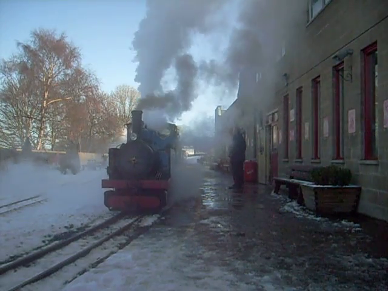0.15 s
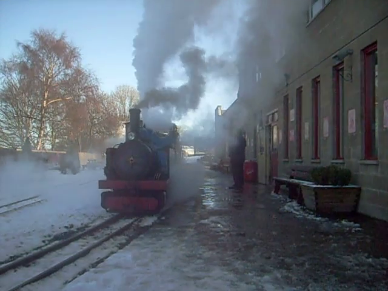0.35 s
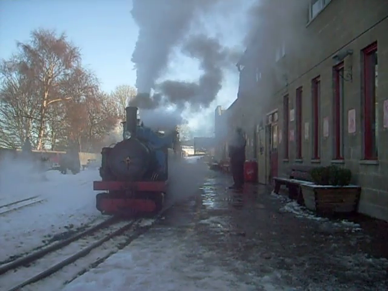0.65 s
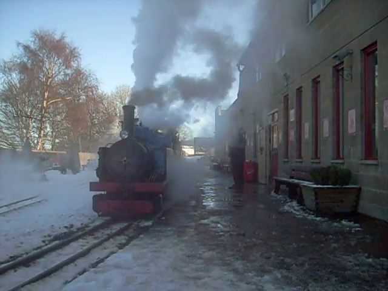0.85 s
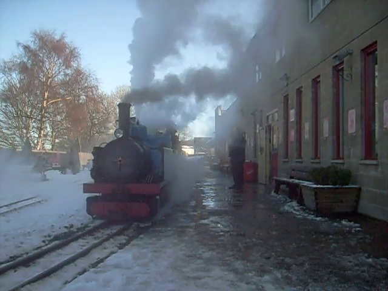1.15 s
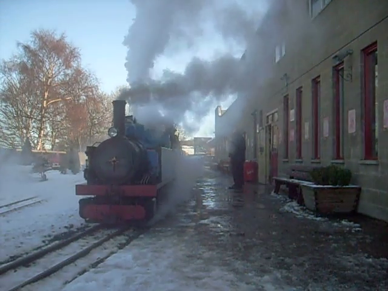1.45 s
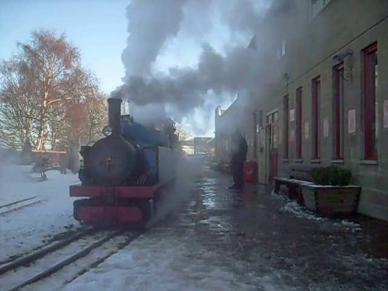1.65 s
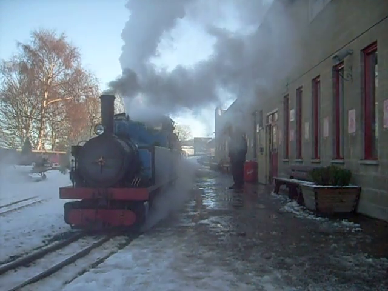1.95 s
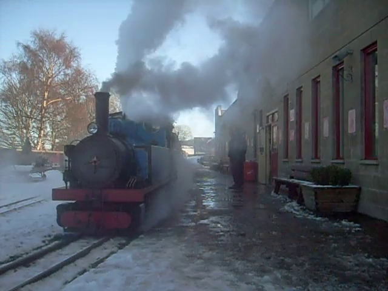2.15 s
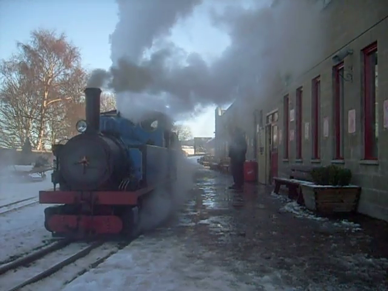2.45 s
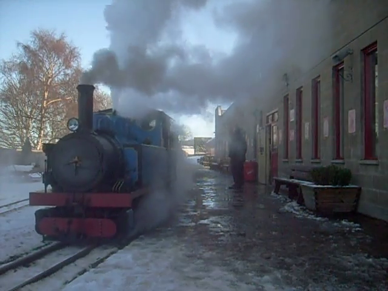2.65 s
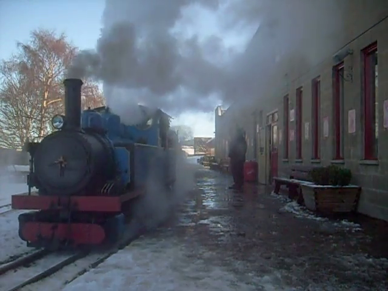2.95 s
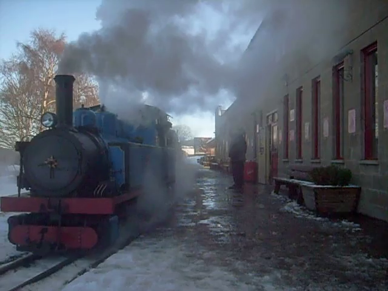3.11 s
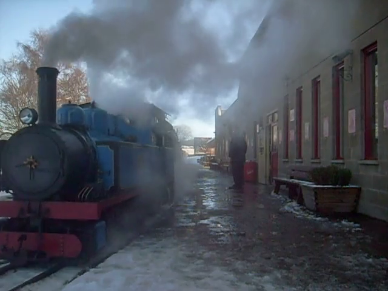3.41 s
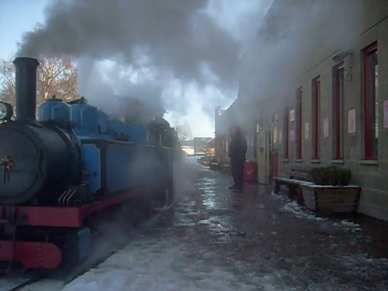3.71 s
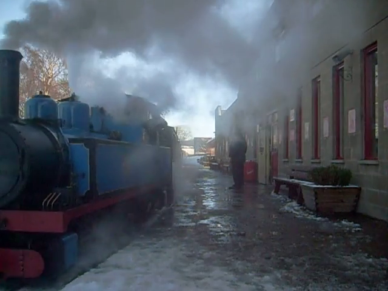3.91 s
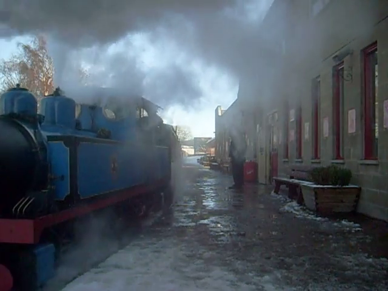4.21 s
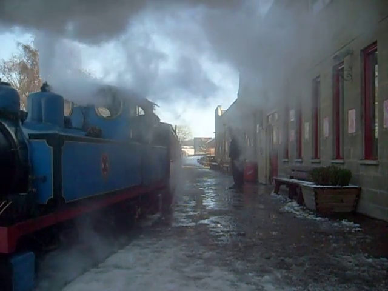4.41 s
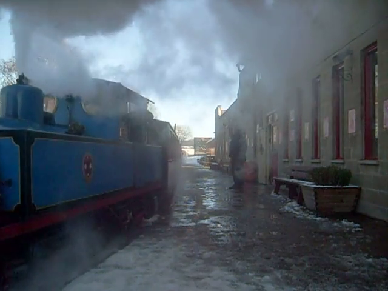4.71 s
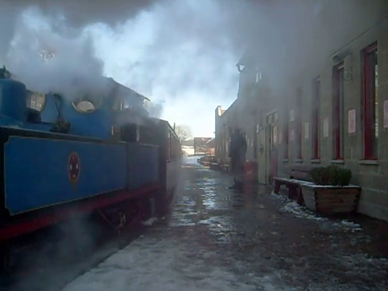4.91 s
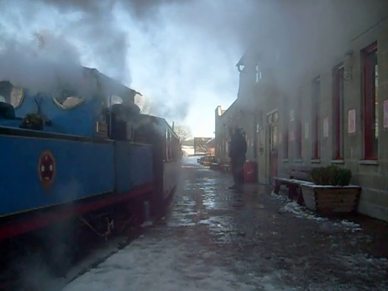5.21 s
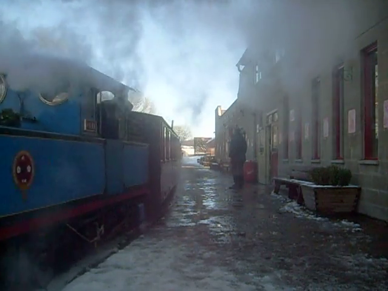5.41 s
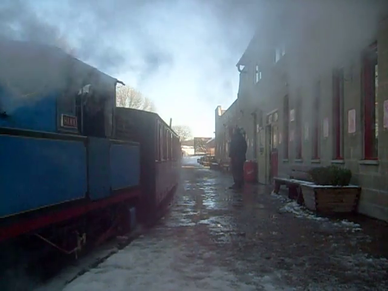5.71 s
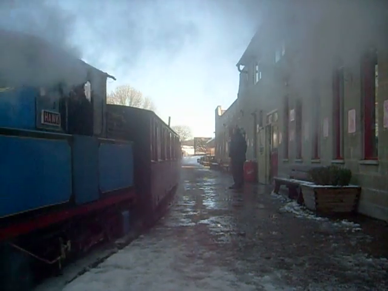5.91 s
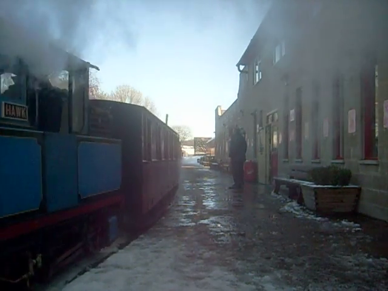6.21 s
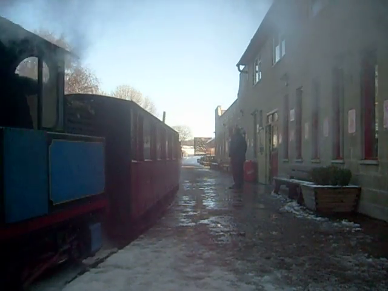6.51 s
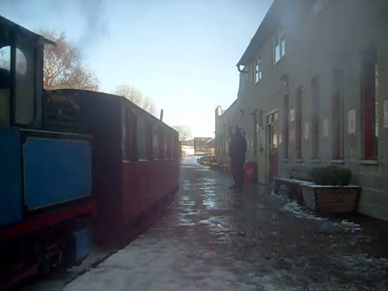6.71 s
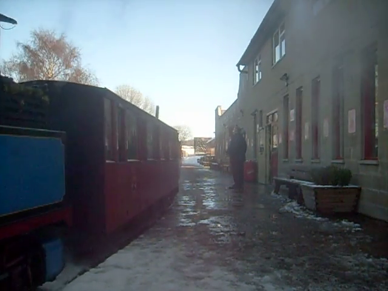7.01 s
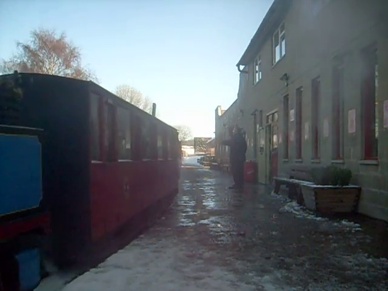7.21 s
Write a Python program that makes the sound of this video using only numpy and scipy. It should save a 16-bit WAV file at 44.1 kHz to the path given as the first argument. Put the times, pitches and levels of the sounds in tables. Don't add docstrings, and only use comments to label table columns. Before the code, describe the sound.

A small steam engine creeps past a platform with a loud, unbroken, ringing steam hiss that swells to near overload, over dull rumbles and rod knocks.

```python
import sys
import numpy as np
from scipy import signal
from scipy.fft import rfft, irfft, next_fast_len
from scipy.io import wavfile
from scipy.ndimage import uniform_filter1d

SR = 44100
rng = np.random.default_rng(int(sys.argv[2]) if len(sys.argv) > 2 else 0)


def volts_from_decibels(level):
    exponent = np.asarray(level, float) / 20
    return 10 ** exponent


def log_audio(samples):
    frames = np.atleast_2d(samples).T
    limited = np.clip(frames, -1, 1)
    pcm = np.round(limited * 32767).astype(np.int16)
    wavfile.write(sys.argv[1], SR, pcm)


N = 324334
T = np.arange(N) / SR
HZ = np.fft.rfftfreq(next_fast_len(N), 1 / SR)

# time in seconds, level of the ringing ridge in dB, level of the open jet in dB.
VALVE_LEVELS = [(0, -21, -22), (.36, -16.5, -21.5), (.6, -19, -19.5), (1.0, -19.5, -20), (1.44, -21, -18.5),
                (1.85, -14.5, -18), (2.3, -17, -16.5), (3.06, -19, -17), (3.5, -17, -17.5),
                (3.96, -18.5, -16.5), (4.32, -14, -17), (4.8, -13, -16), (5.2, -13.5, -13.5),
                (5.45, -14.5, -12.5), (5.9, -13.5, -10.5), (6.45, -13.5, -8), (6.85, -10, -11.5),
                (7.36, -9.5, -9)]
# frequency in Hz, level in dB.
JET_COLOUR = [(500, -39.5), (850, -27.5), (1050, -24), (1500, -16), (2050, -10), (2350, -7), (2600, -0.5),
              (2780, 1), (2950, -0.5), (3250, -5.5), (3600, -10.5), (4300, -15), (5400, -23.5),
              (9000, -35.5)]
JET_PARTS_HZ = [
    1270,
    1870,
    2860,
    4370,
]
# time in seconds, lags in ms by boiler top, ground, cab and wet paving.
ECHO_LAGS_MS = [
    (0, 0.81, 1.6, 3.25, 5.35),
    (1.5, .79, 1.95, 3.15, 5.95),
    (3.2, 0.84, 1.57, 3.11, 5.8),
    (4.25, 0.87, 1.92, 2.93, 5.6),
    (5.5, 0.765, 2.66, 2.7, 4.85),
    (6.6, .62, 3.3, 2.22, 3.93),
    (7.36, 0.59, 4.4, 2, 3.85),
]
# centre in Hz, width in Hz, level in dB.
COCK_HOLES = [
    (6440, 2600, -2.5),
    (9790, 2300, 0.5),
]
# start in seconds, length in seconds, wide cock in dB, narrow cock in dB.
COCK_PUFFS = [(.45, 0.15, -35, -45), (1.05, .08, -34, -53), (1.297, 0.07, -34.5, -47), (1.58, .1, -33, -46),
              (1.838, .22, -37, -41.5), (2.17, 0.089, -50, -37), (2.446, 0.092, -41, -36.5),
              (2.62, .08, -31.5, -35.5), (2.74, 0.29, -34, -39.5), (3.15, .14, -41, -45),
              (3.497, 0.095, -30, -35.5), (3.7, 0.11, -35, -50), (3.927, 0.19, -32.5, -38),
              (4.82, 0.13, -36, -37), (5.15, 0.13, -33, -36), (5.46, 0.16, -37, -36.5),
              (5.722, 0.1, -39, -36.5), (6.14, .12, -43, -35), (6.37, 0.3, -46, -44),
              (6.693, 0.067, -26, -53), (7.02, 0.049, -28.5, -55), (7.3, .1, -37, -40)]
# start in seconds, length in seconds, level in dB, first pitch in Hz.
COCK_SONGS = [
    (.48, .2, -44, 6600),
    (2.62, 0.46, -36.5, 6800),
    (3.48, .14, -37, 6700),
    (3.9, 0.32, -39, 6780),
    (4.8, 0.22, -39, 6870),
]
# centre in Hz, width in Hz.
ROLLING_BANDS = [
    (90, 300),
    (330, 350),
    (680, 610),
]
# start in seconds, length in seconds, then the rise in dB of
ROD_LURCHES = [(.45, 0.17, 10, -2, -6), (.9, .1, 0.5, 3, -5), (1.3, 0.21, 10, 6.5, -1),
               (1.92, 0.14, -1, 6, -6), (2.2, 0.83, -2, 1, 0.5), (3.12, .08, 2.5, 13, 6),
               (3.417, 0.5, 0, 5, 1.5), (4.18, .1, -2, 5, 3), (4.45, 0.079, 9, 8, 7),
               (5.047, .3, 3.5, 2.5, -1), (5.82, .2, 2, 5, -4), (7.25, .1, -2, 1.2, -4)]
# start in seconds, peak in dB, ring in Hz.
ROD_KNOCKS = [(1.309, -42, 161), (1.399, -33, 296), (3.138, -38, 331), (3.667, -27.5, 338),
              (3.834, -37, 413), (4.462, -32, 428), (4.535, -36, 362), (5.747, -33, 354), (5.883, -30, 317),
              (6.104, -29, 334), (6.847, -36, 272), (6.962, -34, 191)]
# start in seconds, peak in dB.
METAL_TICKS = [
    (4.4592, -7),
]
# start in seconds, length in seconds, level in dB, pitch in Hz.
CURVE_GROANS = [
    (.5, 1.2, -50.5, 950),
    (.9, 1.6, -56.5, 730),
    (1.9, 0.67, -55, 260.6),
    (3.3, .25, -51, 324),
    (3.74, .22, -48, 370),
    (4.0, 0.76, -45.5, 1002),
    (5.0, .7, -53.5, 366),
    (5.52, .65, -49.5, 653),
    (5.85, .4, -45, 936),
    (6.45, .2, -52, 300),
]
# frequency in Hz, gain in dB.
UPSAMPLER_GAIN = [
    (10300, 0),
    (11000, -4),
    (11600, -12.5),
    (12100, -24),
    (12500, -60),
    (13000, -90),
]

APPROACH_DB_PER_S, ABREAST_S = 1.5, 6.56
LOW_SIDE_DB, LOW_SIDE_SHARE = -22, 1
HIGH_SIDE_DB, CAB_SHADE_DB, CAB_PASSES_S, CAB_TAKES_S = 0.36, -8.5, 6.52, 0.81
SPIT_DB, SPIT_FROM_S, SPIT_TAKES_S, SPIT_PER_S, SPIT_RIDGE = 3.5, 6.25, 0.86, 110, 0.18
ECHO_DB, ECHO_TOP_HZ = [-23, -17.5, -20, -13], 5900
LEAK_DB, LEAK_SHARE = [-42, -47.5], [.15, 0.6]
PUFF_ATTACK_S, PUFF_RELEASE_S = 0.11, 0.09
SONG_WIDTH_HZ, SONG_EDGE_S, SONG_SAG_HZ_PER_S = 1000, 0.056, 1200
GEAR_DB, GEAR_SHARE, LURCH_EDGE_S = [-65, -60.5, -56], [1.56, 1.4, 1.14], .07
KNOCK_T60_S = 0.075
TICK_RING_HZ, TICK_RING_DB, TICK_T60_S = 5600, -3.5, .003
GROAN_WIDTH_HZ, GROAN_EDGE_S = 64, 0.067
CLIP_LEVEL, CEILING = .68, .716


def valve(spit_db):
    ridge_db, shoulder_db = curves(VALVE_LEVELS)
    low_db = LOW_SIDE_DB + LOW_SIDE_SHARE * approach_db()
    cab_passed = (1 + np.tanh((T - CAB_PASSES_S) / CAB_TAKES_S)) / 2
    high_db = shoulder_db + HIGH_SIDE_DB + CAB_SHADE_DB * cab_passed
    octave = np.log2(HZ + 1e-9)
    jet_hz, jet_db = np.transpose(JET_COLOUR)
    colour = volts_from_decibels(np.interp(octave, np.log2(jet_hz), jet_db, -99, -99))
    ridge_rms = np.sqrt(np.mean(colour ** 2 * (HZ > 2400) * (HZ < 3400)))
    surge = .5 * walk(28)
    jet = 0
    for centre in np.log2(500) + np.arange(14) / 3:
        band = np.cos(np.pi / 2 * np.clip(3 * (octave - centre), -1, 1))
        low, shoulder, ridge, high = (np.interp(centre, np.log2(JET_PARTS_HZ), row) for row in np.eye(4))
        level_db = low * low_db + shoulder * shoulder_db + ridge * ridge_db + high * high_db
        level_db = level_db + (1 - ridge * (1 - SPIT_RIDGE)) * spit_db
        flicker = (.5 + 0.65 * high) * walk(32)
        jet = jet + noise(colour * band) * volts_from_decibels(level_db + surge + flicker)
    return jet / ridge_rms


def echoes(jet):
    dull = signal.sosfilt(signal.butter(1, ECHO_TOP_HZ, fs=SR, output="sos"), jet)
    total = jet
    for db, lag_ms in zip(ECHO_DB, curves(ECHO_LAGS_MS)):
        total = total + volts_from_decibels(db) * np.interp(T - lag_ms / 1000, T, dull, left=0)
    return total / np.sqrt(1 + np.sum(volts_from_decibels(ECHO_DB) ** 2))


def spits():
    surge = walk(SPIT_PER_S)
    closeness = (1 + np.tanh((T - SPIT_FROM_S) / SPIT_TAKES_S)) / 2
    return SPIT_DB * closeness * (np.maximum(surge, 0.44 * surge) - 0.5)


def cocks():
    hiss, sputter = 0, walk(40)
    shapes = np.array([swell(s, length, PUFF_ATTACK_S, PUFF_RELEASE_S) for s, length, *_ in COCK_PUFFS])
    puffs_db = np.transpose(COCK_PUFFS)[2:]
    for (hz, width, db), leak_db, share, puff_db in zip(COCK_HOLES, LEAK_DB, LEAK_SHARE, puffs_db):
        leak = volts_from_decibels(leak_db + share * approach_db())
        flow = np.sqrt(leak ** 2 + volts_from_decibels(puff_db) ** 2 @ shapes)
        droplets = volts_from_decibels(db + 0.69 * sputter + 0.97 * walk(90))
        hiss = hiss + unit(noise(mode(hz, width))) * flow * droplets
    return hiss


def singing_cock():
    return hums(COCK_SONGS, SONG_WIDTH_HZ, SONG_EDGE_S, SONG_SAG_HZ_PER_S)


def knocks():
    out = np.zeros(N)
    for s, db, hz in ROD_KNOCKS:
        span = slice(int(s * SR), int((s + .3) * SR))
        t = np.clip(T[span] - s, 0, 1)
        ring = np.sin(2 * np.pi * hz * t * (1.1 - 5 * np.minimum(t, .03)))
        ring = ring + 0.25 * np.sin(2 * np.pi * 1.19 * hz * t)
        envelope = (1 - np.exp(-t / 0.0034)) * np.exp(-np.log(1000) * t / KNOCK_T60_S)
        out[span] += volts_from_decibels(db + 2.0) * ring * envelope
    return out


def ticks():
    spikes = 0
    for s, db in METAL_TICKS:
        t = np.clip(T - s - .0006, 0, 1)
        decay = np.exp(-np.log(1000) * t / TICK_T60_S)
        ring = volts_from_decibels(TICK_RING_DB) * np.sin(2 * np.pi * TICK_RING_HZ * t) * decay
        spike = np.exp(-((T - s - .0009) / .00003) ** 2)
        spikes = spikes + volts_from_decibels(db + 4) * (spike + ring)
    return signal.sosfilt(signal.butter(1, 500, "high", fs=SR, output="sos"), spikes)


def running_gear(spit_db):
    shapes = np.array([swell(s, length, LURCH_EDGE_S, LURCH_EDGE_S) for s, length, *_ in ROD_LURCHES])
    rises_db = np.transpose(ROD_LURCHES)[2:]
    rumble = 0
    for (hz, width), db, share, rise_db in zip(ROLLING_BANDS, GEAR_DB, GEAR_SHARE, rises_db):
        level_db = db + share * approach_db() + rise_db @ shapes + 0.7 * spit_db + 1.8 * walk(12)
        rumble = rumble + unit(noise(mode(hz, width))) * volts_from_decibels(level_db)
    return rumble


def flanges():
    return hums(CURVE_GROANS, GROAN_WIDTH_HZ, GROAN_EDGE_S, 0)


def hums(rows, width_hz, edge_s, sag_hz_per_s):
    tones = 0
    for s, length, db, hz in rows:
        t = T - s
        tone = np.sin(2 * np.pi * (hz - sag_hz_per_s * t / 2) * t)
        tones = tones + swell(s, length, edge_s, edge_s) * volts_from_decibels(db) * tone
    rub = signal.sosfilt(signal.butter(2, width_hz / 2, fs=SR, output="sos"), rng.standard_normal(N))
    return tones * unit(rub) * np.sqrt(2)


def approach_db():
    return APPROACH_DB_PER_S * np.minimum(T, ABREAST_S)


def swell(s, length, attack, release):
    t = T[::64]
    rise = 1 + np.tanh((t - s) / attack)
    fall = 1 - np.tanh((t - s - length) / release)
    return np.repeat(rise * fall / 4, 64)[:N]


def walk(rate):
    k = int(SR / rate)
    held = np.repeat(rng.standard_normal(N // k + 1), k)
    return 1.16 * uniform_filter1d(uniform_filter1d(held, k), k)[:N]


def noise(gain):
    size = next_fast_len(N)
    return irfft(rfft(rng.standard_normal(size)) * gain, size)[:N]


def mode(hz, width):
    return 1 / (1 + ((HZ ** 2 - hz ** 2) / (width * HZ + 1e-9)) ** 2)


def unit(x):
    return x / np.sqrt(np.mean(x ** 2))


def curves(table):
    s, *columns = np.transpose(table)
    return [np.interp(T, s, c) for c in columns]


def scene():
    spit_db = spits()
    steam = echoes(valve(spit_db)) + cocks() * volts_from_decibels(spit_db) + singing_cock()
    wheels = knocks() + ticks() + running_gear(spit_db) + flanges()
    return (steam + wheels)[None]


def top_cut(x):
    return signal.sosfilt(signal.butter(12, 15830, fs=SR, output="sos"), x)


def record(dry):
    clipped = np.clip(dry, -CLIP_LEVEL, CLIP_LEVEL)
    half_rate = clipped * 2 * (np.arange(N) % 2 == 0)
    gain = volts_from_decibels(np.interp(HZ, *np.transpose(UPSAMPLER_GAIN)))
    size = next_fast_len(N)
    smooth = irfft(rfft(half_rate, size) * gain, size)[:, :N]
    return top_cut(np.clip(smooth, -CEILING, CEILING))


dry = scene()
out = record(dry)
log_audio(out)
```